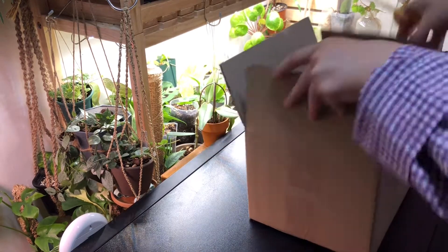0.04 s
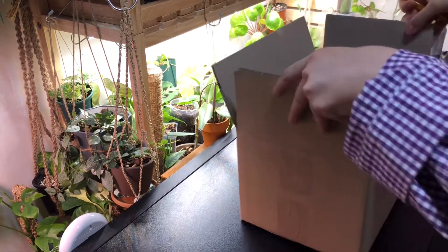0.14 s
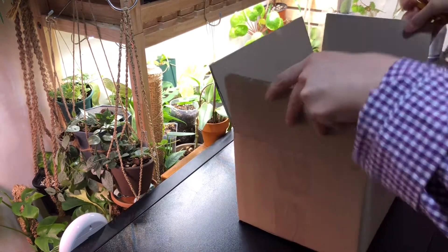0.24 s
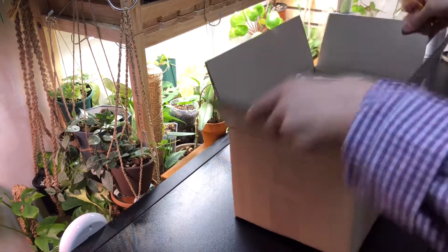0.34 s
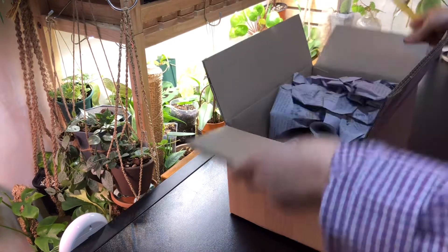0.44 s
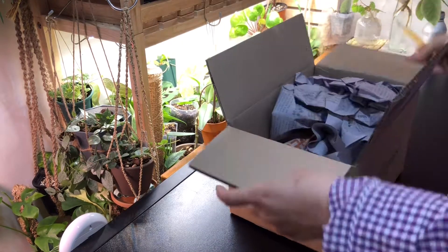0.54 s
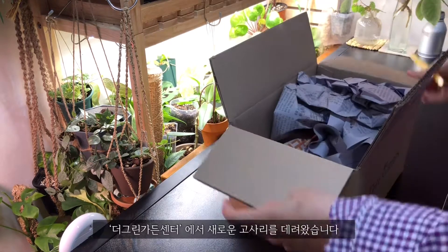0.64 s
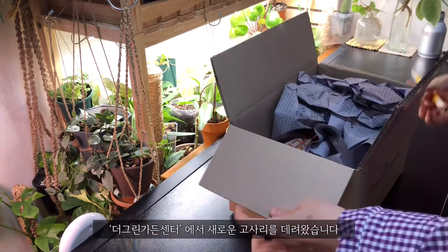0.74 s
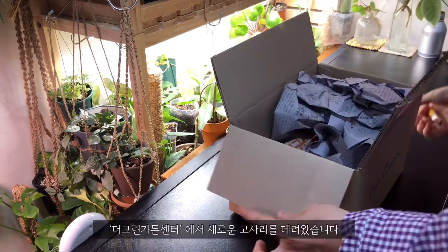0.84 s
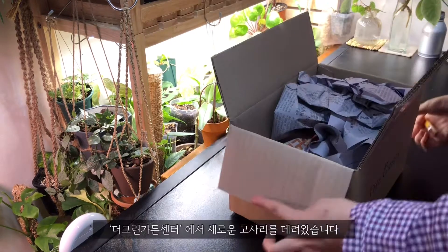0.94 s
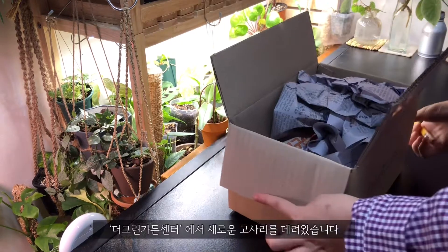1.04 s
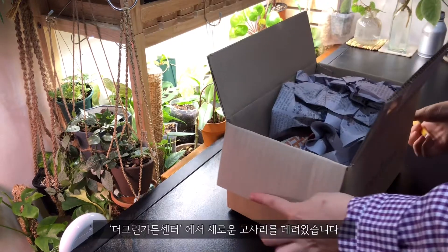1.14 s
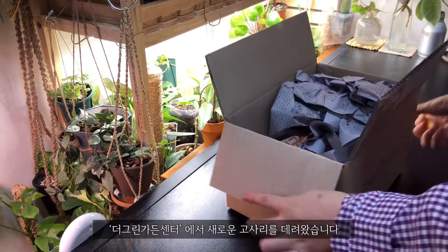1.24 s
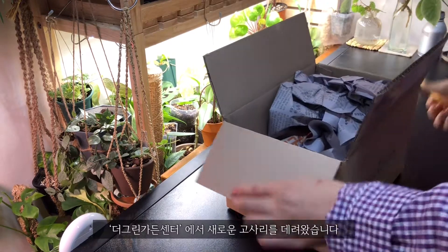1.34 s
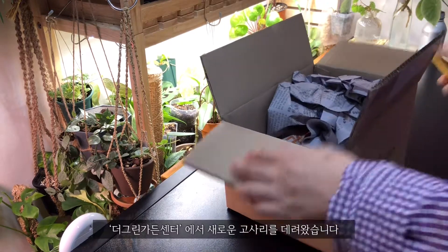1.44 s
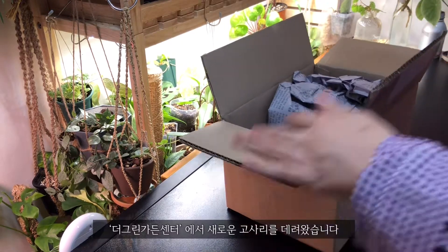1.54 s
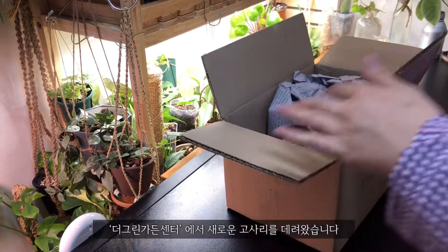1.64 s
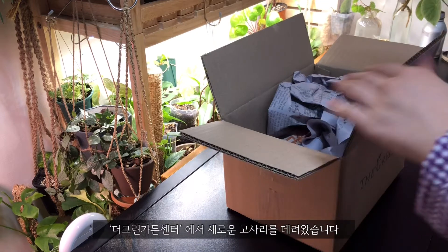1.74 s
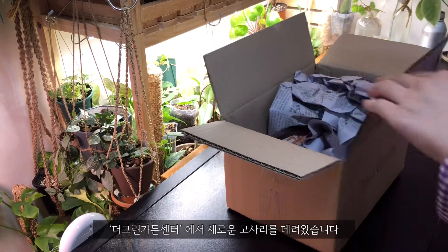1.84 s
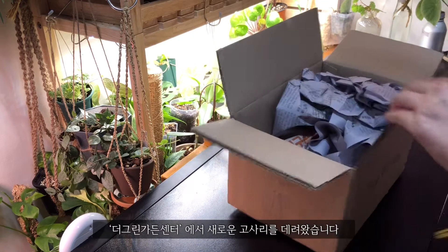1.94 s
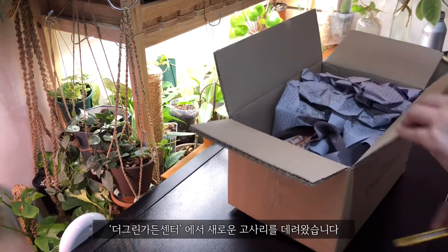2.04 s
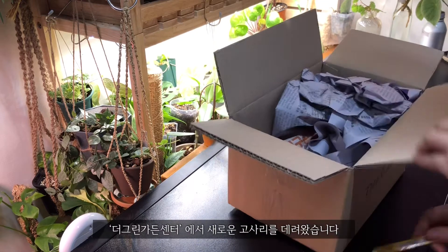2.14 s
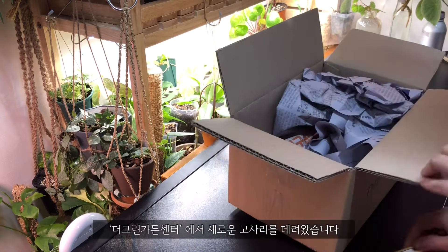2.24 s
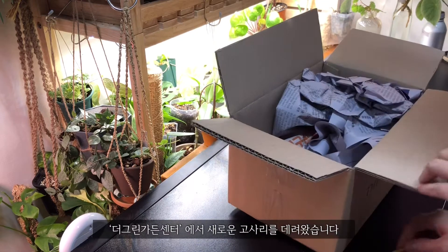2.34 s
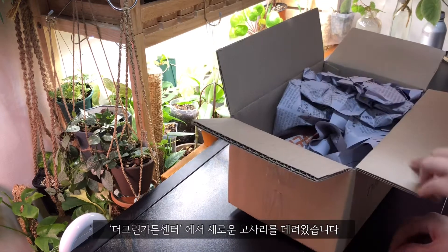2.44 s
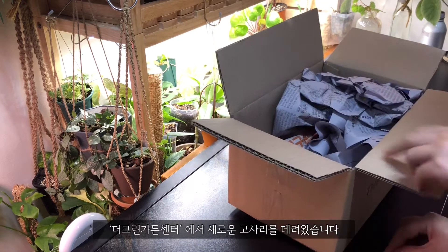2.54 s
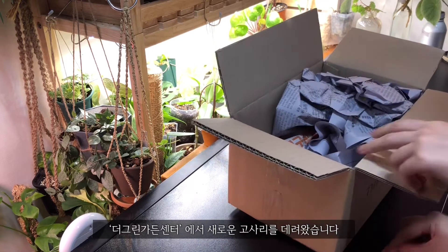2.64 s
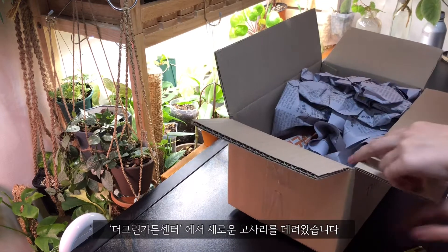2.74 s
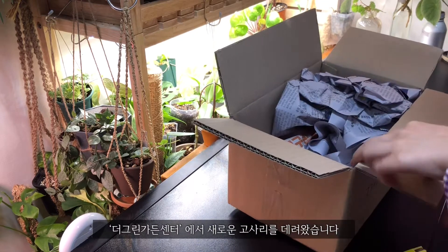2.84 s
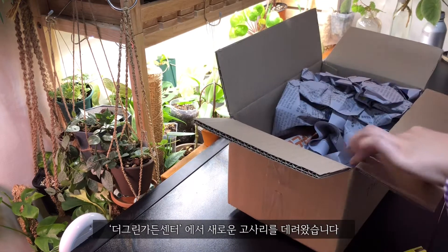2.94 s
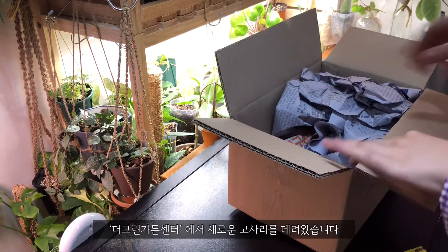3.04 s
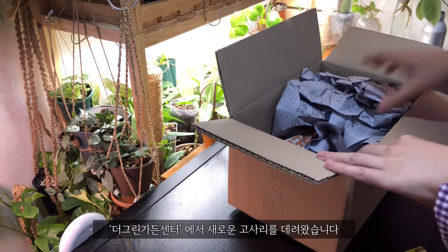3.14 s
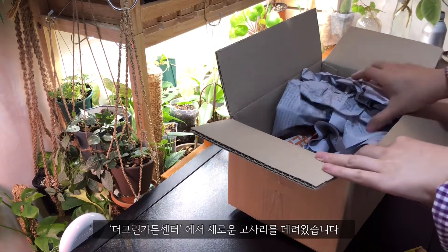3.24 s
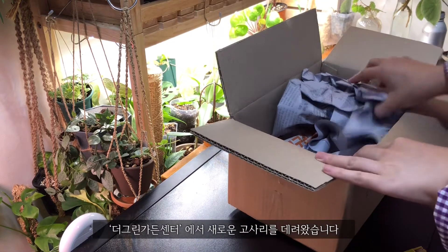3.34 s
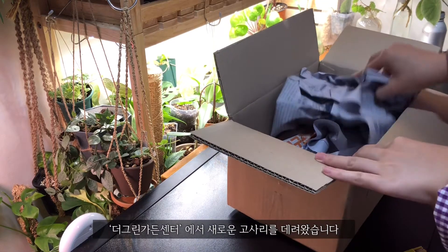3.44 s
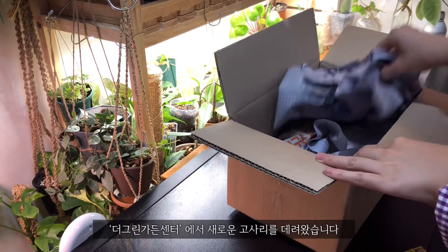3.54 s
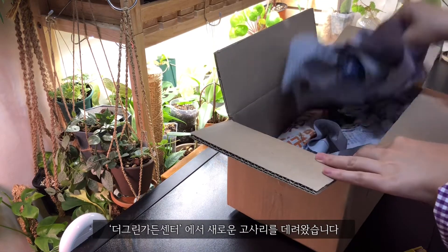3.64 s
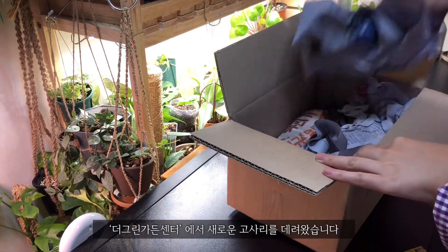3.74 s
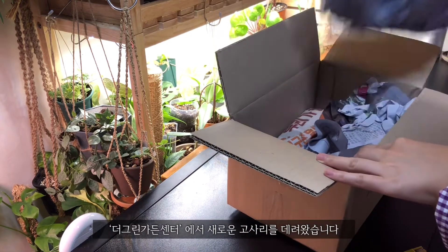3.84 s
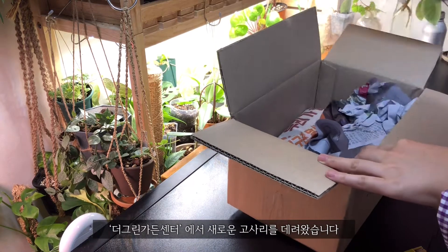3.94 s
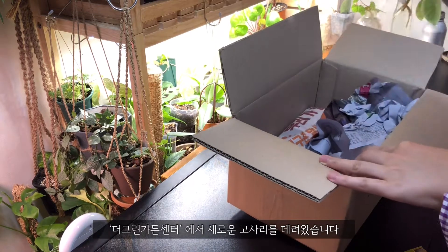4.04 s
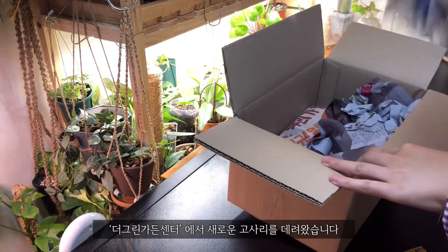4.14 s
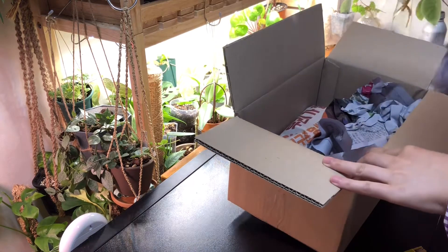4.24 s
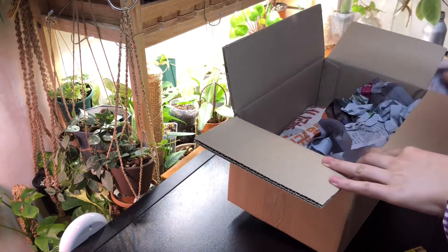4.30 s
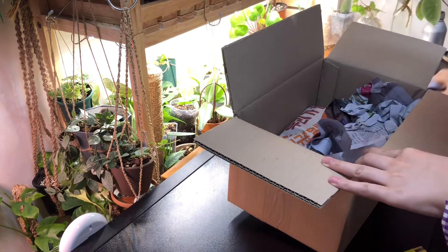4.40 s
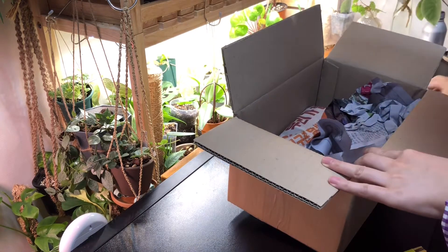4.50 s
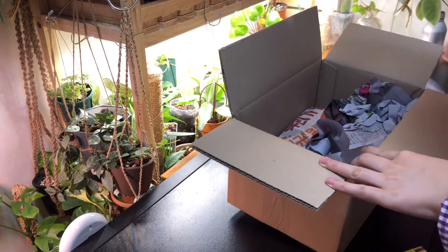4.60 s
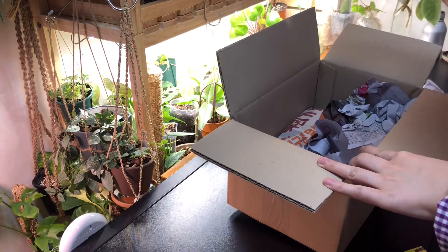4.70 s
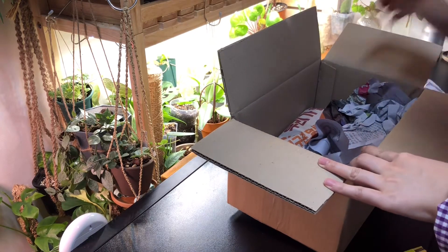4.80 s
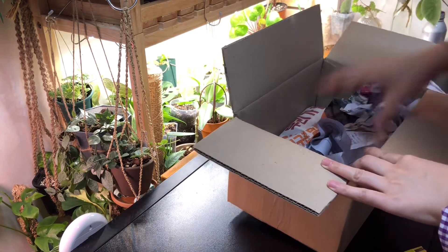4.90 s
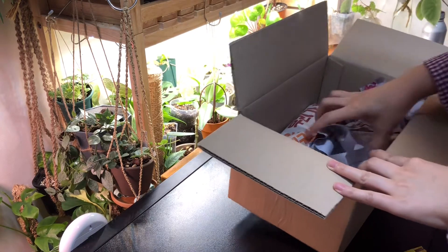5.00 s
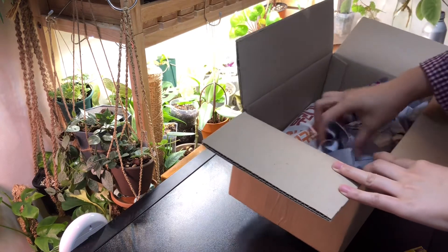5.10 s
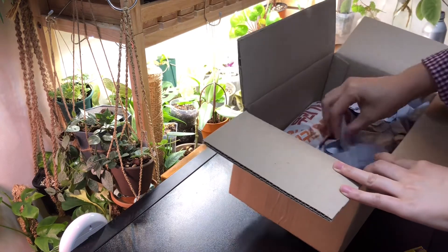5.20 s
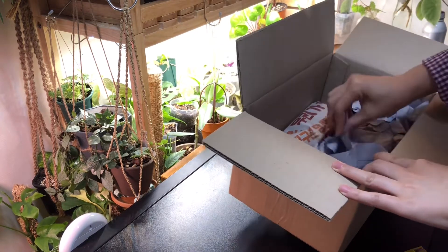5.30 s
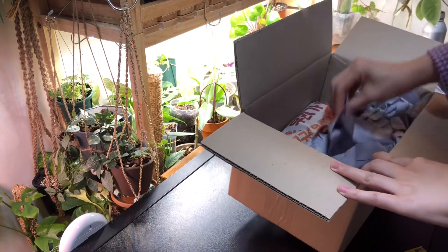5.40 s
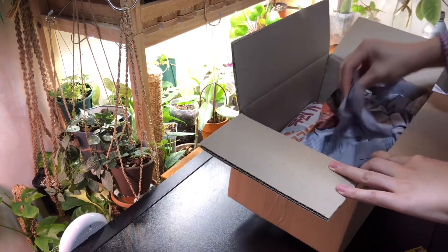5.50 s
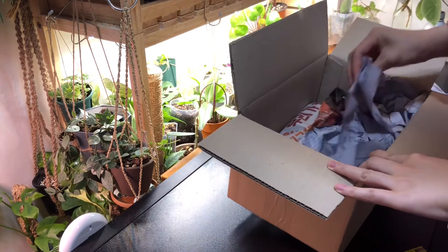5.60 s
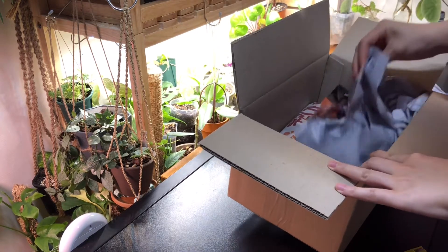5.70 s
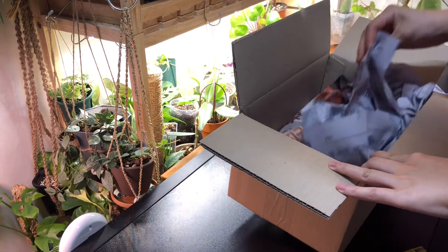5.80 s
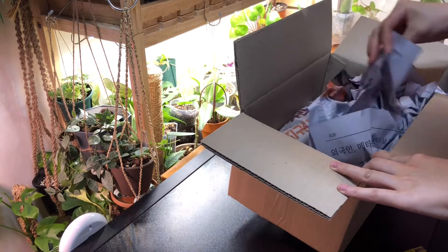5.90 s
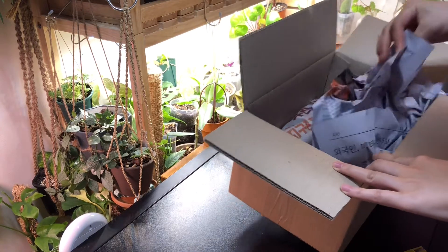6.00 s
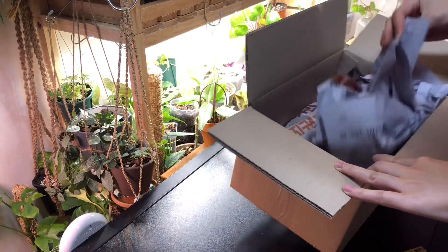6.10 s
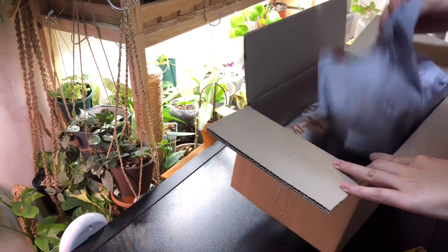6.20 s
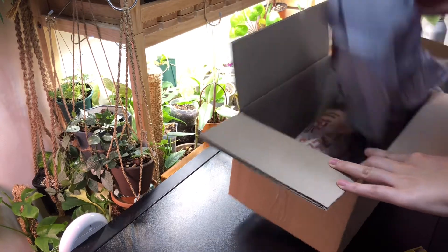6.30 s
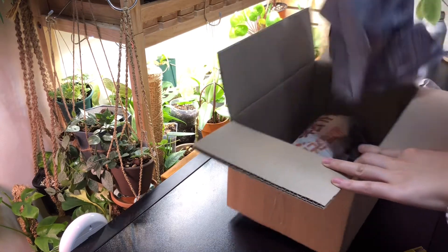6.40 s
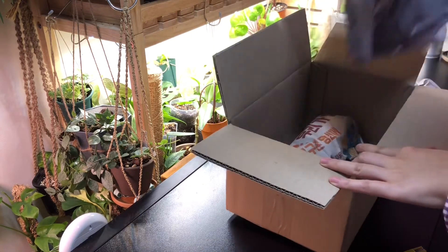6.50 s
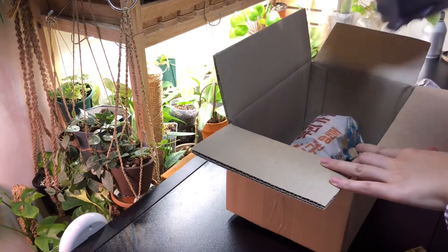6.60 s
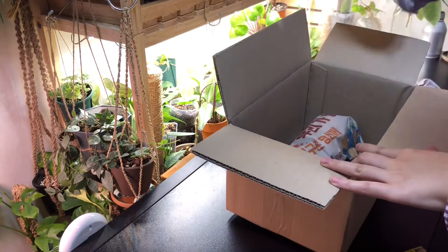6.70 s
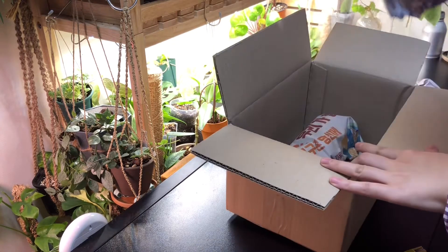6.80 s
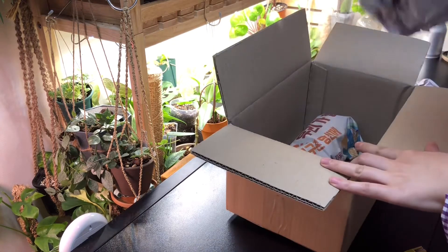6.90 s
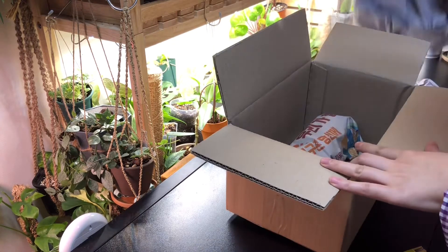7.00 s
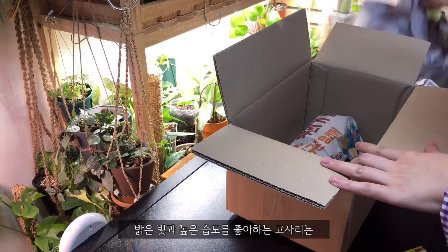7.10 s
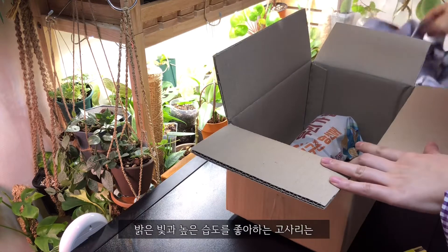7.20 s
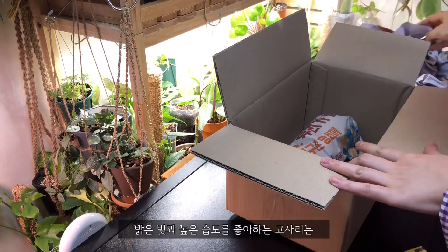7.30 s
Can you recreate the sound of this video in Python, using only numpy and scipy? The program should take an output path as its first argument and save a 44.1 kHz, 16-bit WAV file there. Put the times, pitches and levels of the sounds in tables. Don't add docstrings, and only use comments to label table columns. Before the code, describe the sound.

Cardboard flaps thud and rub, a knife blade ratchets in and knocks down on a table, then crumpled packing paper crackles loudly out of the box.

```python
import sys
import numpy as np
from scipy import signal
from scipy.fft import rfft, irfft, next_fast_len
from scipy.io import wavfile
from scipy.ndimage import uniform_filter1d

SR = 44100
rng = np.random.default_rng(int(sys.argv[2]) if len(sys.argv) > 2 else 0)


def bounce(signal):
    frames = np.transpose(np.atleast_2d(signal))
    limited = np.clip(frames, -1, 1)
    pcm = np.round(limited * 32767).astype(np.int16)
    wavfile.write(sys.argv[1], SR, pcm)


def volts_from_db(level):
    exponent = np.asarray(level, float) / 20
    return 10 ** exponent


N = 324135

# [peak_s, rise_s_per_20db, fall_s_per_20db, level_db, box_weight_db]
FLAP_STROKES = [(.06, 0, 0.25, -54, 1), (.34, .2, 0.3, -59.5, 3), (.62, 1.4, 0.2, -62.5, -20),
                (.9, 0.2, 0.6, -63.5, -3.5), (1.019, -0.24, 0.25, -65, 9), (1.382, 0.1, .2, -56, -12.5),
                (1.48, 0.5, -0.2, -59.5, -5), (1.59, 0, .06, -79.5, 15.5), (1.77, 0, 4, -75, 0),
                (1.92, 0.37, 0.52, -63, 4.5), (2.22, 0.17, .4, -65, 8), (2.347, 0.06, -0.18, -55.5, 4),
                (2.481, .08, 0.15, -54.5, 11.5), (2.619, 1.5, 0.5, -68.5, 15), (2.846, 0, -2.5, -55, -9),
                (3.088, -0.6, -15, -59, -9)]
# [peak_s, rise_s_per_20db, fall_s_per_20db, level_db, box_weight_db]
PAPER_STROKES = [(3.19, 0.04, 0.71, -50, 1.5), (3.33, 0.22, 0.73, -46, -12.5),
                 (3.568, 0.42, 0.15, -43.5, -3.5), (3.776, 0.081, 0.035, -72, -4.5),
                 (3.84, 0.034, 0.33, -74, -12), (3.976, 0.14, 0.12, -64.5, 5), (4.21, 0.017, 0.08, -47, -5),
                 (4.391, 0.11, 0.76, -52.5, -8.5), (4.573, 0.96, 0.055, -57.5, -4),
                 (4.874, 0.05, .05, -90.5, -2), (4.942, 0.014, 0.09, -49.5, 4.5),
                 (5.103, 0.14, .45, -44.5, -6), (5.193, 0.18, 0.24, -53.5, 4.5),
                 (5.363, 0.093, 1.4, -47, -5), (5.697, 0.38, 0.39, -43.5, -4.5),
                 (5.887, 0.41, 0.13, -52.5, 0), (6.2, 0.58, 0.079, -46, -2.5),
                 (6.316, .6, 0.095, -51.5, -3), (6.46, 0.34, 0.049, -71.5, 12),
                 (6.665, 0.17, 0.26, -62, -8), (6.849, 0.053, 0.076, -63.5, -13),
                 (6.944, .1, 0.14, -77, -11), (7.089, 0.2, .3, -66, -24), (7.19, 0.12, 0.26, -52, -1)]
CREASE_HZ = (1200, 2300, 4200, 7500, 12500)
# [freq_hz, density_db]
PAPER_SPECTRUM = [(290, -31), (500, -4.5), (832, -3.5), (962, -5.5), (1530, -8), (1910, -9.5), (2670, -7.5),
                  (3950, -9), (6110, -1), (9180, -5), (14200, -6), (16200, -3)]
# [freq_hz, width_hz, level_db]
BOX_MODES = [(147.4, 69, -10), (171, 33.3, -4), (269, 72.3, -0.5), (321.2, 63, 1.5), (385, 46, -2),
             (455, 18.5, -1), (558, 127, -12.5)]
RESTING_BOOM_DB, RESTING_BODY_DB, RESTING_HISS_DB = -78, -80, -81.5
BOOM_LINGER_RATIO = 1.036
HISS_DB, HISS_PER_DB, HISS_PER_WEIGHT_DB, BOARD_HISS_DB = 7.5, 0.28, -0.21, 3.5

# [start_s, peak_db, treble_re_peak_db]
FLAP_SNAPS = [
    (0.4998, -48, -12),
    (0.9678, -43, -28),
    (1.2684, -38, -12),
    (1.311, -34.5, 0),
    (1.4763, -33.5, -15),
]
# [start_s, peak_db, treble_re_peak_db]
FIRST_SHEET_SNAPS = [(3.1667, -31.5, 5), (3.1916, -25.5, -10), (3.2647, -27.5, -7), (3.31, -28, -12),
                     (3.3298, -19, -18), (3.3673, -25, -9), (3.4211, -20.5, -15), (3.4586, -24, 4),
                     (3.4813, -30.5, -14), (3.516, -31, -7), (3.536, -26, -11), (3.555, -25.5, 10),
                     (3.5683, -11, -5), (3.72, -50, -14), (3.748, -39, -11), (3.768, -49.5, -18),
                     (3.826, -38.5, 3), (3.8537, -37, -19), (3.9587, -40, -16), (3.986, -32, -11),
                     (4.041, -49, -20), (4.091, -48, -23), (4.194, -26, -11), (4.3876, -43, -5),
                     (4.446, -25, -2), (4.547, -46.5, -7)]
# [start_s, peak_db, treble_re_peak_db]
SECOND_SHEET_SNAPS = [(4.93, -34.5, -1), (5.04, -23, 1), (5.052, -21, -38), (5.0799, -28, -28),
                      (5.0946, -24, 9), (5.11, -16, 7.5), (5.1727, -28, -11), (5.187, -18.5, -37),
                      (5.2455, -19, -11), (5.325, -22.5, -28), (5.344, -23, -9), (5.4013, -19.5, 6),
                      (5.446, -32, -12), (5.5623, -20.5, -25), (5.592, -29, -9), (5.5994, -36, -10),
                      (5.6296, -23, 9), (5.683, -25, -21), (5.8763, -20.5, -29), (5.9525, -48, 9),
                      (5.977, -28, -36), (6.019, -25, -34), (6.1224, -36, -3), (6.2722, -28, -35)]
# [start_s, peak_db, treble_re_peak_db]
LAID_ASIDE_SNAPS = [(6.5557, -48.5, -20), (6.6454, -40.5, -14), (6.6758, -46, -14), (6.7333, -38, -5),
                    (6.775, -58, -12), (6.828, -48, -25), (6.9286, -49, -16), (7.0759, -28, -34),
                    (7.111, -39, -32), (7.1343, -41, -4), (7.1458, -22.5, -16), (7.204, -30.5, -6)]
FOLD_BODY_DB, BODY_PER_PEAK_DB, BODY_PER_TREBLE_DB = -28.5, 0.04, -0.45
# [start_s, peak_db, pitch_hz]
TAPS = [(0.755, -57, 1010), (0.791, -55, 900), (1.531, -62, 956), (1.578, -51, 940), (3.08, -46, 926),
        (3.117, -52, 860), (3.1667, -32, 1500), (3.603, -33, 1670), (5.187, -22, 1970),
        (6.122, -33.5, 1980), (6.242, -36, 1360), (7.151, -38.5, 1660)]
# [start_s, level_db, length_s, tilt_db_per_octave]
CRUSHES = [
    (4.192, -41, 0.049, -2.5),
    (4.929, -39, 0.029, -4),
    (5.194, -30, 0.007, 3.5),
    (5.677, -35.5, 0.036, -0.7),
    (6.186, -38.5, 0.023, -3),
    (7.138, -46.5, 0.1, -3),
]

# [start_s, peak_db, pitch_hz, t60_s]
THUMPS = [(0.1, -38, 268, 0.042), (0.142, -39, 284, 0.063), (0.223, -40, 170, 0.031),
          (0.3, -44.5, 281, 0.26), (0.969, -53.5, 350, 0.11), (1.914, -28, 270, 0.044),
          (2.201, -47, 288, 0.19), (2.463, -38.5, 289.6, 0.22), (2.595, -48.5, 305, 0.05),
          (2.646, -38.5, 441, 0.17), (3.184, -28, 190, 0.13), (3.486, -36.5, 350, 0.073),
          (4.21, -45.5, 183, 0.21), (4.929, -34, 475, 0.124), (5.053, -33, 522, 0.012),
          (5.095, -35, 455, 0.062), (5.188, -33.5, 301.5, 0.079), (5.242, -40, 467, 0.047),
          (5.342, -38.5, 489, 0.098), (5.56, -42.5, 380, 0.095), (6.159, -43, 454, 0.047),
          (6.195, -36, 455, 0.12), (6.274, -36.5, 453.4, 0.095), (6.427, -44, 258, 0.05),
          (7.139, -49, 490, 0.18)]
# [start_s, peak_db]
SHOVES = [(0.223, -51), (0.3, -49), (0.97, -61), (1.914, -33), (2.647, -47.5), (3.185, -34.5), (3.486, -51),
          (4.929, -61.5), (5.188, -56), (6.196, -50), (6.428, -61)]
DEEP_HZ, DEEP_WIDTH_HZ, DEEP_T60_S = 138, 60, 0.26

# [start_s, peak_db]
RATCHET = [(1.7667, -23.5), (1.7912, -23), (1.814, -24), (1.834, -22.5), (1.8506, -21.5), (1.863, -23.5),
           (1.8732, -20.5), (1.8835, -20), (1.892, -20), (1.901, -19), (1.909, -23), (1.9142, -18),
           (1.922, -21), (1.9287, -23), (1.9364, -19), (1.9442, -21), (1.954, -17), (1.9648, -13),
           (1.9767, -18), (1.9868, -22), (2.0061, -17), (2.029, -18), (2.0584, -16.5), (2.0947, -34)]
RATTLE_DB = -12.5
# [freq_hz, width_hz, level_db]
BLADE_MODES = [(7160, 570, 0), (8300, 120, -23), (11400, 230, -5), (12100, 400, -21.5), (13000, 680, 2),
               (16540, 500, 6.5)]
# [start_s, peak_db, treble_re_peak_db, t60_s]
KNOCKS = [
    (2.204, -27, -10, 0.048),
    (2.464, -17, -2.5, 0.066),
    (2.487, -26, -5.5, 0.14),
    (2.65, -15.5, -5, 0.071),
    (2.676, -18, -0.5, 0.1),
]
# [freq_hz, width_hz, level_db]
KNIFE_MODES = [(1225, 46, 4.5), (1310, 27, -28), (1980, 28, 5.5), (2440, 46, -19), (2630, 180, 3),
               (3350, 66, -19), (3260, 59, -2), (4300, 33, -12), (5400, 270, 1), (6860, 51, -17),
               (7400, 310, -4)]
# [time_s, high_modes_db, low_modes_db]
SLIDE = [
    (2.22, -58, -49),
    (2.25, -55, -54),
    (2.3, -69, -61),
    (2.33, -49, -55),
    (2.37, -50.5, -49),
    (2.41, -70, -53.5),
    (2.455, -59, -49),
]
# [freq_hz, width_hz, level_db]
SCRAPE_MODES = [(730, 180, -0.5), (1180, 36, -12), (1440, 65, 4.5), (1980, 36, 7), (2290, 28, 6.5),
                (2620, 49, 7.5), (3180, 93, 5), (3180, 78, -10), (3800, 79, -42.5)]

ROOM_T60_S, ROOM_DB = 0.11, -16.5
# [freq_hz, density_db]
AIR_SPECTRUM = [(15, -39), (25, -36), (39, -7), (64, -0.5), (122, -13), (155, -7.5), (173, -9), (203, -13),
                (252, -15), (550, -46), (646, -24), (719, -18), (15400, -44)]
AIR_DB = -74.5
TOP_HZ = 15760


def unit(x):
    return x / np.sqrt(np.mean(x ** 2))


def shape(x, gain):
    size = next_fast_len(len(x))
    hz = np.arange(size // 2 + 1) * SR / size + 1
    return irfft(rfft(x, size) * gain(hz), size)[:len(x)]


def colour(points):
    hz, db = np.transpose(points)
    return lambda f: volts_from_db(np.interp(np.log(f), np.log(hz), db))


def band(lo_hz, hi_hz):
    return lambda f: 1 / (1 + lo_hz / (1j * f)) ** 2 / (1 + 1j * f / hi_hz) ** 2


def peaks(modes, widen):
    def gain(f):
        total = 0
        for k, (hz, width_hz, db) in enumerate(modes):
            detune = (f * f - hz * hz) / (f * width_hz * widen)
            total = total + (-1) ** k * volts_from_db(db) / (1 + 1j * detune)
        return total
    return gain


def fade(t60_s, size):
    return volts_from_db(-60 * np.arange(size) / SR / t60_s)


def add(out, start_s, peak_db, sound):
    i = int(start_s * SR)
    sound = sound[:N - i]
    out[i:i + len(sound)] += sound * volts_from_db(peak_db) / np.abs(sound).max()


def flicker(rate_hz, db):
    k = int(SR / rate_hz)
    steps = np.repeat(rng.standard_normal(N // k + 1), k)[:N]
    return volts_from_db(db * uniform_filter1d(steps, k))


def crackle(rate_hz, spread_db, ring_s):
    timing, size = rng.random((2, N))
    slips = (timing < rate_hz / SR) * volts_from_db(-spread_db * np.log(1 - size).clip(-3, 0))
    return unit(signal.lfilter([1], [1, -np.exp(-1 / (ring_s * SR))], slips))


def handling():
    boom_gain, body_gain, hiss_gain = strokes()
    slips = 1 + 0.34 * crackle(rate_hz=170, spread_db=1.0, ring_s=0.0028)
    rub = flicker(70, db=1.6) * slips * rng.standard_normal(N)
    pops = np.zeros(N)
    for hz in CREASE_HZ:
        pop = crackle(rate_hz=95, spread_db=6.0, ring_s=0.0028) * rng.standard_normal(N)
        pops += unit(shape(pop, band(hz / 0.93, hz * 1.66))) * np.sqrt(hz)
    sheet = shape(unit(rub) + volts_from_db(-5.5) * unit(pops), colour(PAPER_SPECTRUM))
    boom = unit(shape(flicker(60, db=4.0) * rub, peaks(BOX_MODES, widen=1.36)))
    body = unit(shape(sheet, band(lo_hz=532, hi_hz=3920)))
    hiss = unit(shape(sheet, band(lo_hz=3200, hi_hz=38700)))
    return boom * boom_gain * volts_from_db(0.37) + body * body_gain * volts_from_db(4.0) + hiss * hiss_gain * volts_from_db(3.0)


def strokes():
    t = np.arange(0, N + 64, 64) / SR
    s, rise, fall, db, weight = np.transpose(FLAP_STROKES + PAPER_STROKES)[:, :, None]
    after_last = t > np.r_[[[-1]], s[:-1]]
    before_next = t < np.r_[s[1:], [[99]]]
    turn = after_last & before_next

    def swell(fall_s):
        return -20 * np.where(t < s, (s - t) / rise.clip(0.005), (t - s) / fall_s.clip(0.005))

    on_board = s < PAPER_STROKES[0][0]
    hiss_db = db + HISS_DB + HISS_PER_DB * db + HISS_PER_WEIGHT_DB * weight + BOARD_HISS_DB * on_board
    layers = [(db + weight + swell(fall * BOOM_LINGER_RATIO), RESTING_BOOM_DB),
              (db + swell(fall), RESTING_BODY_DB),
              (hiss_db + swell(fall), RESTING_HISS_DB)]
    gains = []
    for level_db, rest_db in layers:
        power = uniform_filter1d((turn * volts_from_db(level_db) ** 2).sum(axis=0), size=5) + volts_from_db(rest_db) ** 2
        gains.append(np.interp(np.arange(N) / SR, t, np.sqrt(power)))
    return gains


def snaps():
    out, size = np.zeros(N), 2048
    middle, body = band(lo_hz=2450, hi_hz=10000), band(lo_hz=640, hi_hz=2960)
    treble = band(lo_hz=6700, hi_hz=60000)
    decay = fade(0.0053, size) + volts_from_db(-9) * fade(0.024, size) + volts_from_db(-18.0) * fade(0.18, size)
    for s, db, treble_db in FLAP_SNAPS + FIRST_SHEET_SNAPS + SECOND_SHEET_SNAPS + LAID_ASIDE_SNAPS:
        body_db = FOLD_BODY_DB + BODY_PER_PEAK_DB * db + BODY_PER_TREBLE_DB * treble_db
        jolt = rng.standard_normal(size) * decay
        add(out, s, db - 0.5, shape(shape(jolt, middle), middle))
        add(out, s, db + body_db + 0.9, shape(shape(jolt, body), body))
        add(out, s, db + treble_db + 0.47, shape(shape(jolt, treble), treble))
    for s, db, hz in TAPS:
        tap = rng.standard_normal(size) * fade(0.041, size)
        add(out, s, db - 0.8, shape(tap, peaks([(hz, 0.31 * hz, 0)], widen=0.88)))
    return out


def crushes():
    out, t = np.zeros(N), np.arange(8192) / SR
    grit = (1 + 0.9 * crackle(rate_hz=500, spread_db=4.5, ring_s=0.0012)) * rng.standard_normal(N)
    grit = shape(shape(grit, colour(PAPER_SPECTRUM)), band(lo_hz=350, hi_hz=13200))
    for s, db, length_s, tilt_db in CRUSHES:
        swell = np.clip(t / 0.0032, 0, 1) * volts_from_db(-300 * np.clip(t - length_s, 0, 1) - 6 * t / length_s)
        i = int(s * SR)
        piece = unit(shape(grit[i:i + len(t)], lambda f: volts_from_db(tilt_db * np.log2(f / 2000))))
        out[i:i + len(t)] += volts_from_db(db) * swell * piece
    return out


def thumps():
    out, size = np.zeros(N), 8192
    t = np.arange(size) / SR
    for s, db, hz, t60_s in THUMPS:
        soft_onset = 1 - np.exp(-t / 0.0046)
        wall = np.sin(2 * np.pi * hz * t) * fade(np.clip(t60_s, 0.01, 1), size) * soft_onset
        others = shape(rng.standard_normal(size) * fade(0.028, size), peaks(BOX_MODES, widen=0.69))
        add(out, s, db - 0.6, unit(wall) + volts_from_db(-4.0) * unit(others))
    for s, db in SHOVES:
        push = rng.standard_normal(size) * fade(DEEP_T60_S, size)
        add(out, s, db + 0.48, shape(push, peaks([(DEEP_HZ, DEEP_WIDTH_HZ, 0)], widen=0.66)))
    return out


def ratchet():
    out, size = np.zeros(N), 3072
    highpass = signal.butter(7, 4500, "high", fs=SR, output="sos")
    for s, db in RATCHET:
        jolt = rng.standard_normal(size) * (fade(0.0027, size) + volts_from_db(RATTLE_DB) * fade(0.11, size))
        tick = signal.sosfilt(highpass, jolt)
        ring = shape(tick, peaks(BLADE_MODES, widen=3.4))
        add(out, s, db - 0.6, unit(tick) + volts_from_db(2.0) * unit(ring))
    return out


def knocks():
    out, size = np.zeros(N), 6144
    for s, db, treble_db, t60_s in KNOCKS:
        decay = fade(0.013, size) + volts_from_db(5.5) * fade(np.clip(t60_s, 0.01, 1), size)
        jolt = rng.standard_normal(size) * decay
        modes = unit(shape(jolt, peaks(KNIFE_MODES, widen=1.7)))
        clack = unit(shape(jolt, band(lo_hz=724, hi_hz=4900)))
        add(out, s, db + 0.5, modes + volts_from_db(4.5) * clack)
        add(out, s, db + treble_db, shape(jolt, band(lo_hz=5000, hi_hz=30200)))
    return out


def play(rows):
    s, *columns = np.transpose(rows)
    return [np.interp(np.arange(N) / SR, s, c, left=-120, right=-120) for c in columns]


def slide():
    high_db, low_db = play(SLIDE)
    grain = flicker(60, db=2.2) * (1 + 0.4 * crackle(rate_hz=400, spread_db=3.5, ring_s=0.0015))
    hum = shape(grain * rng.standard_normal(N), peaks(SCRAPE_MODES, widen=1.1))
    high = shape(shape(hum, band(lo_hz=1800, hi_hz=9000)), band(lo_hz=1500, hi_hz=9000))
    low = shape(shape(hum, band(lo_hz=400, hi_hz=1700)), band(lo_hz=302, hi_hz=2000))
    return unit(high) * volts_from_db(high_db + 1.0) + unit(low) * volts_from_db(low_db - 5.0)


def room(near):
    size = int(0.4 * SR)
    walls = shape(rng.standard_normal(size), band(lo_hz=113, hi_hz=14600)) * fade(ROOM_T60_S, size)
    walls = np.r_[np.zeros(130), walls / np.linalg.norm(walls)]
    return volts_from_db(ROOM_DB) * signal.fftconvolve(near, walls)[:N]


def room_air():
    air = unit(shape(rng.standard_normal(N), colour(AIR_SPECTRUM)))
    return air * volts_from_db(AIR_DB) * flicker(13, db=4.0)


def scene():
    near = handling() + snaps() + crushes() + thumps() + ratchet() + knocks() + slide()
    return (near + room(near) + room_air())[None]


def band_limit(x):
    return signal.sosfilt(signal.butter(12, 16990, fs=SR, output="sos"), x)


def record(dry):
    x = shape(dry[0], band(lo_hz=47.7, hi_hz=1e6))
    top = shape(x, lambda f: f > TOP_HZ)
    power = shape(x, lambda f: f > TOP_HZ / 3) ** 2
    sudden = uniform_filter1d(power, size=128) > 4.5 * uniform_filter1d(power, size=2048)
    gate = signal.fftconvolve(sudden, np.hanning(256) / 128, "same")
    mix = x - top + volts_from_db(-28) * gate * top
    return band_limit(mix[None])


dry = scene()
out = record(dry)
bounce(out)
```